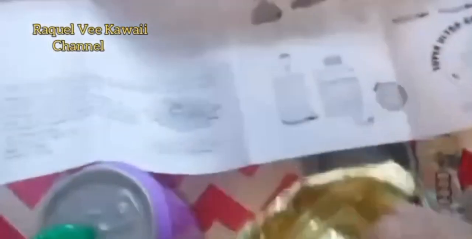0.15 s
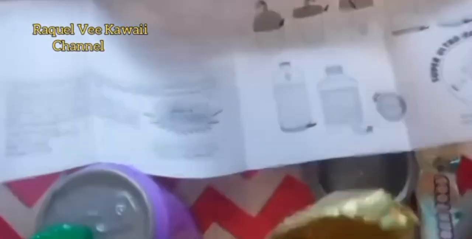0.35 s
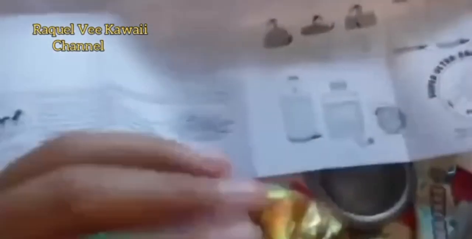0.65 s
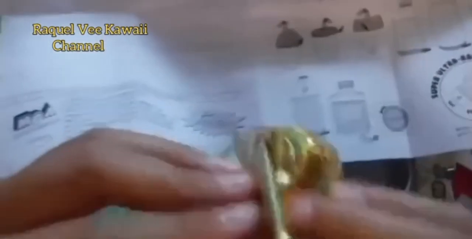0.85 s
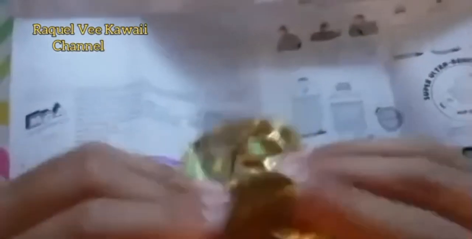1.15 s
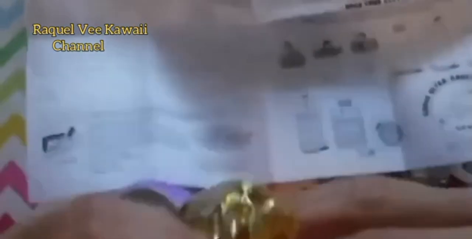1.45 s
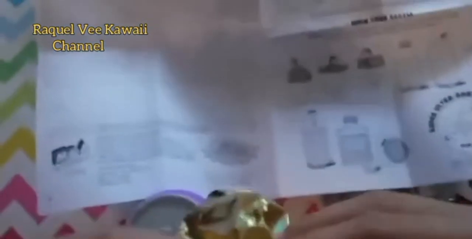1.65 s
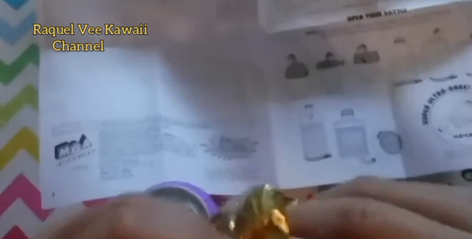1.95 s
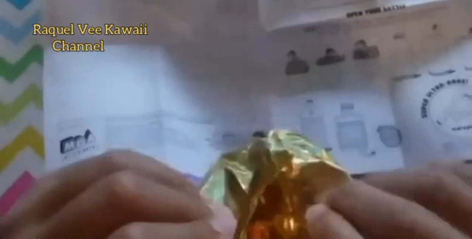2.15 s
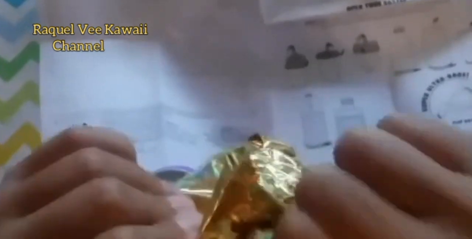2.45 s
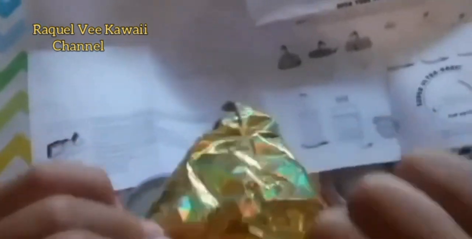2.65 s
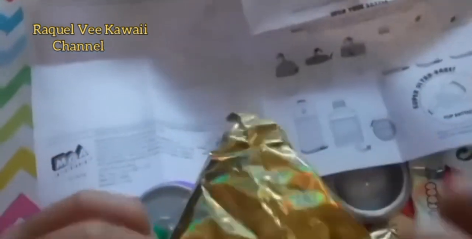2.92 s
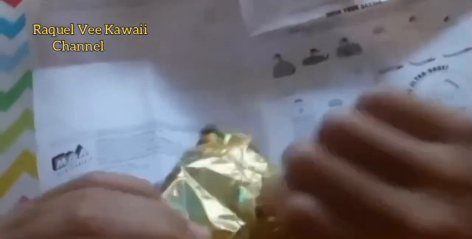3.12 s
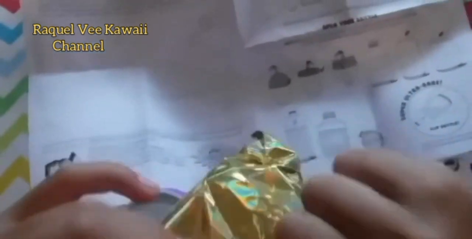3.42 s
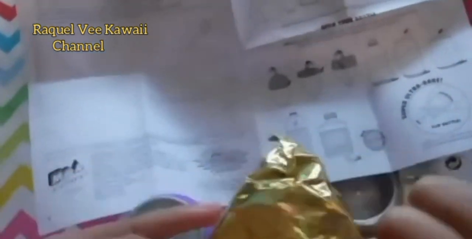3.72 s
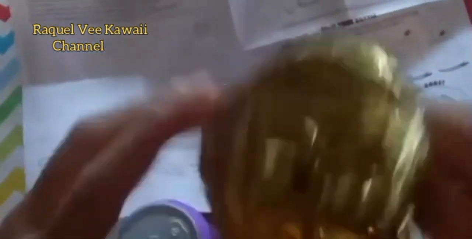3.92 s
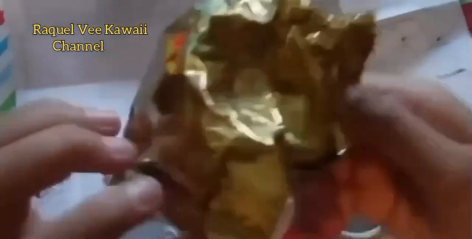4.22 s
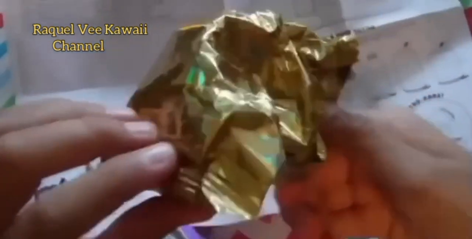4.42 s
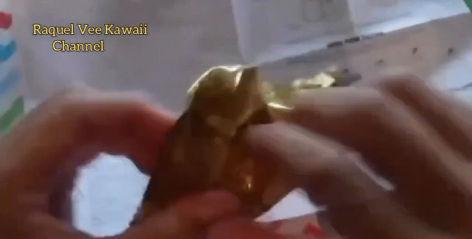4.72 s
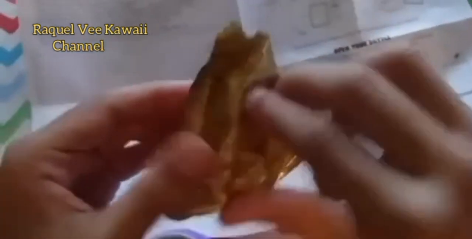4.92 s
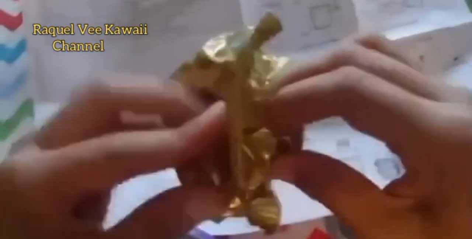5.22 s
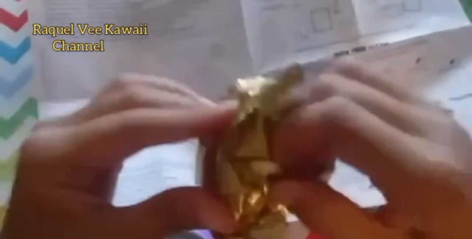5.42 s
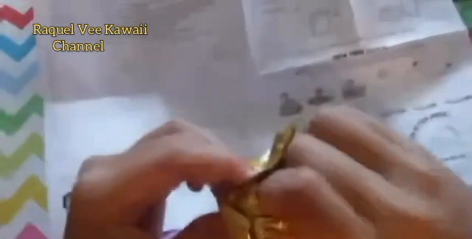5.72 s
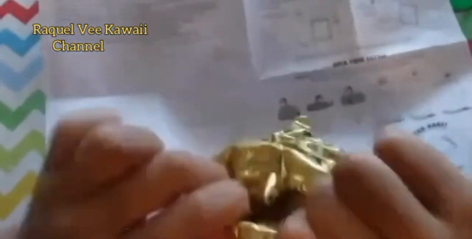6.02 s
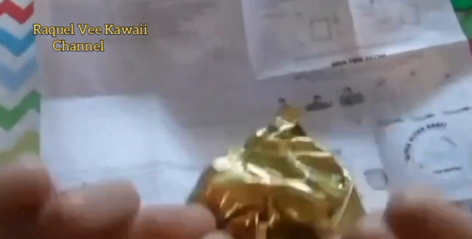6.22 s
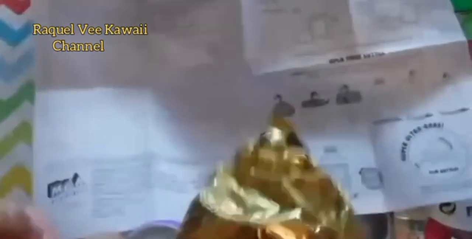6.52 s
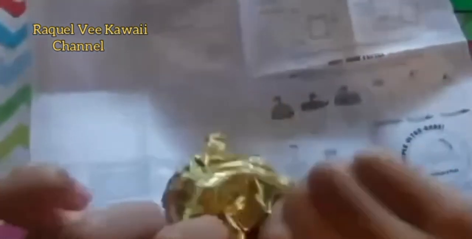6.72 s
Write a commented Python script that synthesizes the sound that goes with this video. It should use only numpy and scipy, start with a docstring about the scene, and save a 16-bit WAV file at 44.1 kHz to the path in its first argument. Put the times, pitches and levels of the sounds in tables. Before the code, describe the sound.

Close, dry crinkling of a metallic wrapper in a quiet room: rapid snaps, fine rustle, a sparse lull, then renewed crackling and a brief creak.

```python
"""A stiff foil wrapper is crumpled by two hands close to a microphone in a quiet room.
Each crease is a noise burst plus a kick: a short bright crack, a ringing facet, a dull flex of the sheet.
Loud snaps are listed; random small creases and filtered-noise rustle follow the squeezes of the fingers.
Large folds add puffs of air, a finger creaks once along the foil, and wavering room hiss lies below.
"""
import sys
import numpy as np
from scipy import signal
from scipy.fft import rfft, irfft, next_fast_len
from scipy.io import wavfile
from scipy.ndimage import uniform_filter1d

SR = 44100
rng = np.random.default_rng(int(sys.argv[2]) if len(sys.argv) > 2 else 0)


def wav_out(sig):
    """Save sig, one row per channel (or a flat mono array), as 16-bit PCM at SR to the path in sys.argv[1]."""
    wavfile.write(sys.argv[1], SR, np.round(np.clip(np.atleast_2d(sig).T, -1, 1) * 32767).astype(np.int16))


N = 302594
GRAIN = 768  # samples per burst
GRAIN_T = (np.arange(GRAIN) - GRAIN // 2)[None] / SR  # s, 0 at the centre


def undb(db):
    """Amplitude factor of a level in dB."""
    return 10 ** (np.asarray(db) / 20)


def level(x, db):
    """Scale x to an RMS level in dB."""
    return x * undb(db) / np.sqrt(np.mean(x ** 2))


def colour(x, table):
    """Filter the last axis by a (f/Hz, level/dB) spectrum, interpolated over log frequency."""
    hz, db = np.transpose(table)
    f = np.arange(x.shape[-1] // 2 + 1) * SR / x.shape[-1]
    gain = undb(np.interp(np.log(f + 1), np.log(hz), db))
    return irfft(rfft(x) * gain, x.shape[-1])


def resonance(x, hz, sharpness):
    """Each row through its own second-order band-pass; sharpness is its Q."""
    tune = (np.arange(GRAIN // 2 + 1) * SR / GRAIN + 1) / hz[:, None]
    return irfft(rfft(x) / (1 + 1j * sharpness * (tune - 1 / tune)), GRAIN)


def waver(s):
    """Smooth random wandering with spread 1 that changes over s seconds."""
    k = int(s * SR)
    return level(uniform_filter1d(uniform_filter1d(rng.standard_normal(N), k), k), 0)


def lay(s, grains):
    """Sum grains into one track, each centred on its time."""
    at = (s * SR).astype(int)[:, None] + np.arange(GRAIN) - GRAIN // 2
    at = np.clip(at, 0, N)
    return np.bincount(at.ravel(), grains.ravel(), N + 1)[:N]


RISE_SHARE, FALL_SHARE, BLUNT = .22, .5, 1.15  # time constants / burst length, decay exponent


def swell(t, rise, fall):
    """Quick build-up to t = 0, slower fall after it."""
    reach = np.maximum(-t / rise, t / fall)
    return np.exp(-reach ** BLUNT)


def even_peak(x):
    """Scale each row to an envelope of 1 over its loudest millisecond, about 40 samples."""
    power = uniform_filter1d(2 * x ** 2, size=40)
    return x / np.sqrt(power.max(axis=1, keepdims=True))


SNAP_MS, SNAP_SPREAD = 4.45, 0.27  # median burst length, log spread
KICK_DB, KICK_SCATTER_DB = 18, 4  # re burst noise, at length SNAP_MS
EDGE_HZ, EDGE_OCTAVES, EDGE_SHARPNESS = 8570, 0.41, 2.43
FACET_SHARPNESS = 1.5
SHEET_DB = -12.5  # re facet ring
SHEET_HZ, SHEET_OCTAVES, SHEET_SHARPNESS = 760, .25, 2
# brightness of a crack at the microphone: f/Hz, level/dB
CRACK_SPECTRUM = [(300, -26), (2000, -4), (5400, -4), (7500, -2), (9700, 3.5), (12000, -5), (15200, -22.5)]


def buckle(s, db, ring_db, hz, ms, edge_hz=EDGE_HZ, edge_octaves=EDGE_OCTAVES, sharpness=FACET_SHARPNESS):
    """One burst per crease: noise and a kick excite the crack, its facet and the flexing sheet."""
    n = len(s)
    length_s = ms[:, None] / 1000
    shape = swell(GRAIN_T, RISE_SHARE * length_s, FALL_SHARE * length_s)
    # the instant the crease gives way
    sign = np.sign(rng.standard_normal((n, 1)))
    kick_gain = undb(KICK_DB + KICK_SCATTER_DB * rng.standard_normal((n, 1)))
    kick = (GRAIN_T == 0) * sign * np.sqrt(ms[:, None] / SNAP_MS) * kick_gain
    burst = rng.standard_normal((n, GRAIN)) * shape + kick
    facet_burst = rng.standard_normal((n, GRAIN)) * shape + kick

    # every crease edge has its own colour
    edges_hz = edge_hz * 2 ** (edge_octaves * rng.standard_normal(n))
    crack = resonance(colour(burst, CRACK_SPECTRUM), edges_hz, EDGE_SHARPNESS)
    ring = resonance(resonance(facet_burst, hz, sharpness), hz, sharpness)
    sheet_hz = SHEET_HZ * 2 ** (SHEET_OCTAVES * rng.standard_normal(n))
    sheet = resonance(burst, sheet_hz, SHEET_SHARPNESS)
    dull = undb(ring_db)[:, None] * (even_peak(ring) + undb(SHEET_DB) * even_peak(sheet))
    return lay(s, undb(db)[:, None] * (even_peak(crack) + dull))


GRIP_DB_PER_S, LET_GO_DB_PER_S, SETTLE_DB, SETTLE_DB_PER_S = 501, 497, 7, 137
# squeezes of the fingers: start t/s, hold/s, small crackle level/dB, facet ring re crack level/dB
SQUEEZES = [(0.0, 0.257, -28.5, -5.5), (0.329, 0.1, -49, 0.5), (0.439, 0.06, -40.5, 2.5),
            (0.652, 0.01, -37, 6.5), (0.763, 0.022, -25.5, -3), (0.902, 0.031, -23.5, -2),
            (0.991, 0.099, -30, -5.5), (1.129, 0.0029, -29.5, 3.5), (1.202, 0.003, -29.5, -7.5),
            (1.277, 0.011, -26.5, -3.5), (1.399, 0.018, -37, -0.5), (1.573, 0.017, -41.5, -29),
            (1.686, 0.0038, -28.5, -10), (1.803, 0.037, -36, 5), (1.869, 0.15, -26.5, -14.5),
            (2.064, 0.027, -19, -13), (2.17, 0.032, -19, -5), (2.223, 0.0032, -27.5, 3),
            (2.265, 0.21, -26.5, -8.5), (2.509, 0.2, -40.5, -4), (2.782, 0.034, -25.5, -9.5),
            (2.977, 0.059, -28, -5), (3.107, 0.091, -43, 2.5), (3.192, 0.046, -35, 4.5),
            (3.295, 0.088, -25.5, -5.5), (3.524, 0.11, -40.5, -0.5), (3.785, 0.1, -37, -0.5),
            (3.967, 0.0078, -51.5, -21), (4.122, 0.011, -44.5, 0), (4.236, 0.149, -44.5, 3.5),
            (4.457, 0.08, -43.5, -3), (4.675, 0.029, -42, 7), (4.792, 0.13, -39.5, -3),
            (4.98, 0.084, -21, -8), (5.192, 0.039, -23.5, -5.5), (5.3, 0.042, -33.5, -3),
            (5.395, 0.0048, -21, -11), (5.445, 0.26, -29.5, -7), (5.752, 0.084, -25, -6.5),
            (5.883, 0.09, -23, -9.5), (6.018, 0.35, -24.5, -16.5), (6.428, 0.045, -42, -5.5),
            (6.545, 0.14, -28, -6.5), (6.784, 0.068, -29, -10.5)]


def effort():
    """Each squeeze rises, holds and dies away; returns summed level and mean facet ring, in dB."""
    t = np.arange(0, N + 64, 64) / SR
    s, hold, db, ring_db = np.transpose(SQUEEZES)[:, :, None]
    before = s - t
    after = t - s - hold
    # a quick drop, then the foil settles more slowly
    fall_db = np.minimum(LET_GO_DB_PER_S * after, SETTLE_DB + SETTLE_DB_PER_S * after)
    fade_db = np.clip(np.maximum(GRIP_DB_PER_S * before, fall_db), 0, 200)
    power = undb(db - fade_db) ** 2
    total = power.sum(axis=0)
    mean_ring_db = (power * ring_db).sum(axis=0) / total
    at = np.arange(N) / SR
    return np.interp(at, t, 10 * np.log10(total)), np.interp(at, t, mean_ring_db)


SMALL_PER_S = 320  # candidates, before thinning
BUSY_DB, THINNING = -25, .4  # all candidates break above BUSY_DB; dB of chance per dB of effort
SMALL_DB, SMALL_SCATTER_DB, LARGEST = 3, 5, 0.95  # re effort, exponential scatter, its cut-off quantile
SMALL_MS, SMALL_SPREAD, SMALL_MIX_DB = 2.5, .8, 16  # median length, +- log range, full ring range
SMALL_FACET_HZ, FACET_OCTAVES = 2700, 1.1  # median, +- range


def crackle(work_db, ring_db):
    """Small creases buckle at random moments, few large and many tiny."""
    chance = rng.random((int(N / SR * SMALL_PER_S), 6))
    # a light touch breaks fewer creases
    busy = undb((work_db[(chance[:, 0] * N).astype(int)] - BUSY_DB) * THINNING)
    when, size, facet, mix, long, _ = chance[chance[:, -1] < busy].T
    at = (when * N).astype(int)
    size_db = work_db[at] + SMALL_DB - SMALL_SCATTER_DB * np.log(1 - LARGEST * size)
    hz = SMALL_FACET_HZ * 2 ** (FACET_OCTAVES * (2 * facet - 1))
    small_ring_db = ring_db[at] + SMALL_MIX_DB * (mix - .5)
    ms = SMALL_MS * np.exp(SMALL_SPREAD * (2 * long - 1))
    return buckle(when * N / SR, size_db, small_ring_db, hz, ms)


RUSTLE_DB = -3.5  # skin noise re effort
RUB_BODY_HZ, RUB_BODY_DB = 2410, 7
RUSTLE_PATCHY_DB, RUSTLE_PATCH_S, RUSTLE_SPLIT_HZ = 4, .007, (1500, 3500, 7000)
# rustle of skin on foil: f/Hz, level/dB
RUB_SPECTRUM = [(300, -13.5), (3000, -3), (9700, 0.5), (16000, -13.5)]


def rustle(work_db, ring_db):
    """Skin rubs on foil: coloured noise follows the effort, patchy in four bands."""
    rub = level(colour(rng.standard_normal(N), RUB_SPECTRUM), RUSTLE_DB)
    # the facets hum along when they are free to ring
    body = signal.filtfilt(*signal.butter(2, RUB_BODY_HZ, fs=SR), rub)
    full = rub + body * (undb(ring_db + RUB_BODY_DB) - 1)
    lows = [signal.sosfiltfilt(signal.butter(2, hz, fs=SR, output="sos"), full) for hz in RUSTLE_SPLIT_HZ]
    bands = np.diff([0 * full, *lows, full], axis=0)
    # each band comes and goes by itself
    patchy = sum(band * undb(RUSTLE_PATCHY_DB * waver(RUSTLE_PATCH_S)) for band in bands)
    return undb(work_db) * patchy


ROOM_DB, ROOM_WAVER_DB, ROOM_WAVER_S = -52, 2.5, .03
# quiet room and microphone hiss: f/Hz, relative density level/dB per Hz
ROOM_SPECTRUM = [(20, 14), (250, 14.5), (500, 12.5), (1760, 9), (4200, 1), (11500, 1), (16000, -9.5)]


def room_hiss():
    """Coloured noise of the quiet room and the microphone, wavering in level."""
    hiss = colour(rng.standard_normal(N), ROOM_SPECTRUM)
    return level(hiss * undb(ROOM_WAVER_DB * waver(ROOM_WAVER_S)), ROOM_DB)


# loud snaps: t/s, crack level/dB, facet ring re crack level/dB, facet f/Hz
LOUD_SNAPS = [(0.0067, 1, -8, 3022), (0.047, -9, -8, 3705), (0.054, -6, -17, 3680), (0.0865, -8, -7, 2532),
              (0.1146, -21, -5, 4150), (0.1257, -9, -11, 2860), (0.1404, -16, -3, 3510),
              (0.148, -8.5, -4, 4130), (0.168, -12, -14, 3454), (0.1864, -4.5, -26, 3040),
              (0.277, -22, 2, 3753), (0.3337, -19, 1, 3930), (0.395, -26.5, -12, 1713),
              (0.4445, -9, 2, 5220), (0.4516, -15.5, 0.5, 1980), (0.4918, -18, -13, 2584),
              (0.5159, -22, 5, 3720), (0.5354, -9.5, -11.5, 3960), (0.6487, -13.5, -17, 3270),
              (0.6754, -5.5, -8.5, 3895), (0.715, -7.5, -9, 3224), (0.7525, -4.5, -8, 2118),
              (0.7778, -8.5, -2, 3900), (0.817, -10, -9, 3110), (0.8652, -2.5, -9, 2244),
              (0.912, -8, -7, 3379), (0.922, -6, -17, 3773), (0.972, -10.5, 3, 3920),
              (0.9892, -6.5, -8, 3150), (1.0044, 0.5, -11.5, 1991), (1.009, -5.5, -5, 2678),
              (1.049, -9, -18, 3550), (1.072, -9.5, -5, 4350), (1.1045, -7, -6, 3030),
              (1.1503, -14, 0.5, 3512), (1.196, -13, -27.5, 2372), (1.2625, -2.5, -10, 3160),
              (1.2784, -8, -17.5, 3575), (1.294, -2.5, -8.5, 3740), (1.3322, -13.5, -14, 3200),
              (1.364, -29.5, 12, 3990), (1.385, -6, -7, 2720), (1.558, -14, -5, 3754),
              (1.5759, -8.5, -32.5, 4490), (1.5973, -19, -10, 3050), (1.6476, -5.5, -22, 3360),
              (1.6668, -14, 0, 3750), (1.6836, -11, -6.5, 4160), (1.792, -22.5, 3, 797),
              (1.799, -10.5, -7, 1100), (1.82, 1.5, -25, 3230), (1.868, -10, -28, 4058),
              (1.876, -3.5, -16, 3134), (1.8862, -10.5, -19, 4580), (1.9017, -3.5, -33, 4547),
              (1.9248, -5.5, -14, 2980), (1.9725, -5.5, -5, 4654), (2.001, -4.5, -14.5, 3342),
              (2.0364, -2.5, -10.5, 3014), (2.06, -6, -28, 3360), (2.067, -4, -24.5, 3494),
              (2.0733, -11, -3, 4620), (2.0812, -12, -3, 4590), (2.093, 2, -15, 4900),
              (2.162, -14, 2.5, 3750), (2.1926, -1.5, -10.5, 4204), (2.196, -3.5, -11.5, 798.6),
              (2.2188, -3, -9, 3024), (2.2392, 1, -16.5, 1850), (2.252, 0, -21, 2730),
              (2.256, -2, -8.5, 4290), (2.2921, -7, -9, 3525), (2.3239, -3.5, -3, 3163),
              (2.3846, -17.5, -3, 3023), (2.4126, -13, 3.5, 2264), (2.422, -4.5, -5.5, 4200),
              (2.479, -9.5, -33, 4355), (2.5659, -4.5, -34, 4207), (2.571, -15, -7, 2400),
              (2.5883, -10.5, -23, 2900), (2.607, -18, 3.5, 2740), (2.6286, -9, -3.5, 3630),
              (2.656, -9, -33, 4460), (2.665, -11, -26, 4700), (2.683, -10.5, -8, 2510),
              (2.7321, -16, -8.5, 3670), (2.752, -3.5, -29.5, 4090), (2.7902, -2.5, -9, 4190),
              (2.918, -33.5, 11, 3393), (2.9365, -8, -8, 3265), (2.9559, -10.5, -9.5, 3610),
              (2.9798, -11, -20, 2600), (2.997, -10, -11, 3680), (3.006, -13.5, 4, 3670),
              (3.0329, -2, -9, 3684), (3.0748, -14, -12, 2917), (3.139, -31, 5, 3480),
              (3.1634, -11, -5, 2710), (3.1941, -12, 1, 3626), (3.2081, -2.5, -12, 2700),
              (3.2124, -6.5, -11, 4173), (3.251, -10.5, -7.5, 2634), (3.2622, -7.5, -7, 860),
              (3.275, -10, -5.5, 1690), (3.3715, -13, -13, 1762), (3.3946, -13, -10, 2640),
              (3.4226, -10, -0.5, 2070), (3.5036, -13, -24, 3090), (3.5112, -4.5, -8.5, 2410),
              (3.5208, -12, -6, 1400), (3.574, -16.5, -28, 2380), (3.5984, -10, -1.5, 2860),
              (3.6067, -15.0, -4, 3080), (3.6584, -15, -8, 2562), (3.8714, -11, -9.5, 2478),
              (3.974, -25.5, 1.5, 3296), (4.131, -22, -11, 2760), (4.2426, -6.5, -5.5, 1940),
              (4.2877, -21, 0, 3490), (4.3596, -17, -1, 2207), (4.439, -12, 5, 3970),
              (4.4876, -7, -10.5, 2544), (4.652, -10.5, -10, 3010), (4.759, -13.5, -2.5, 1490),
              (4.7635, -18, 2, 2910), (4.7933, -23, -1, 4290), (4.824, -17, -6, 3000),
              (4.839, -2, -18, 3017), (4.892, -18.5, -4.5, 2000), (4.9373, -6.5, -5, 3740),
              (4.9434, -12.5, -8, 4060), (4.95, -2.5, -7, 3466), (4.9848, -4, -6, 3400),
              (4.9894, 1, -7, 4360), (5.0054, -3, -22, 3620), (5.013, -7.5, -14, 700),
              (5.042, -14, -1, 2700), (5.1496, -1, -8.5, 2777), (5.1683, -11, -3, 2200),
              (5.206, -11.5, -11.5, 2810), (5.2138, -1, -20, 3023), (5.224, 4, -18, 3600),
              (5.2561, -5, -7.5, 2730), (5.285, -4, -8, 3570), (5.295, -9.5, -6.5, 2864),
              (5.3206, -7, -11, 3544), (5.331, -10.5, 2.5, 4223), (5.3833, -8.5, -9, 2973),
              (5.3928, -3, -8.5, 2680), (5.4058, -13, -1, 2584), (5.427, -6, -3, 3070),
              (5.476, -6.5, -4.5, 2490), (5.4909, -8, -27, 4120), (5.5137, 1, -12.5, 3863),
              (5.5233, -3, -7.5, 2643), (5.5699, -12, -15, 2090), (5.579, -6.5, -8, 2835),
              (5.646, -8, -3, 2050), (5.6592, -6.5, -2.5, 2737), (5.698, -22.5, 11, 3437),
              (5.798, -3, -26, 4270), (5.8417, -19.5, 6.5, 2310), (5.8507, -5.5, -11, 2348),
              (5.899, -6, -11.5, 3320), (5.924, 1.5, -10, 2872), (5.978, -14, -6, 4424),
              (6.0159, -9.5, -13, 4380), (6.068, -7.5, -4, 3700), (6.168, -7, -32, 3993),
              (6.2614, -0.5, -4.5, 2475), (6.321, -6.5, -1.5, 2926), (6.4118, -10, -2.5, 4683),
              (6.4935, -19.5, -1.5, 2530), (6.529, -9, -6, 3713), (6.538, -10.5, -23, 3645),
              (6.5668, -8.5, -5, 3140), (6.6072, -10, -3.5, 4114), (6.6564, -2.5, -17, 3556),
              (6.716, -16, 4.5, 3084), (6.7755, -14, -8, 4580), (6.793, -6, -5.5, 2828),
              (6.8361, -0.5, -15, 3826)]


def snaps():
    """The loud creases buckle, each with a slightly different burst length."""
    s, db, ring_db, hz = np.transpose(LOUD_SNAPS)
    ms = SNAP_MS * np.exp(SNAP_SPREAD * rng.standard_normal(len(s)))
    return buckle(s, db, ring_db, hz, ms)


THUD_S = 0.00064  # Gaussian half-width at 1/e
# large folds collapse: t/s, peak level/dB
FOLD_THUDS = [(0.01, -24), (0.45, -27.5), (1.003, -22), (1.294, -26.5), (2.061, -26), (2.196, -20),
              (2.328, -22), (4.986, -27), (6.166, -31), (6.322, -24.5)]


def thuds():
    """One-sided puffs of air when a large fold gives way near the microphone."""
    s, db = np.transpose(FOLD_THUDS)
    return lay(s, undb(db)[:, None] * np.exp(-(GRAIN_T / THUD_S) ** 2))


CREAK_MS, CREAK_JITTER, CREAK_SCATTER_DB = .35, .05, 2  # jitter in slip periods
CREAK_RING_DB, CREAK_HZ, CREAK_EDGE_HZ, CREAK_SHARPNESS = -16, 3200, 10300, 5
# a finger drags and creaks: t/s, slip rate f/Hz, level/dB
CREAK_DRAG = [(6.05, 390, -20), (6.085, 390, -11), (6.1, 300, -10), (6.125, 245, -13), (6.18, 215, -15),
              (6.235, 225, -11), (6.3, 210, -14), (6.345, 240, -16), (6.375, 330, -28)]


def creak():
    """Stick-slip: nearly even, very short ticks whose rate follows the drag."""
    s, rate_hz, db = np.transpose(CREAK_DRAG)
    t = np.arange(s[0], s[-1], 1 / SR)
    turns = np.cumsum(np.interp(t, s, rate_hz)) / SR
    when = t[1:][np.diff(np.floor(turns)) > 0]
    jitter, scatter = rng.standard_normal((2, len(when)))
    when = when + CREAK_JITTER * jitter / np.interp(when, s, rate_hz)
    tick_db = np.interp(when, s, db) + CREAK_SCATTER_DB * scatter
    same = np.ones(len(when))
    return buckle(when, tick_db, CREAK_RING_DB * same, CREAK_HZ * same, CREAK_MS * same,
                  CREAK_EDGE_HZ, edge_octaves=0, sharpness=CREAK_SHARPNESS)


WIDE_S = .002
# level of the side signal, a little treble width: f/Hz, level/dB
SIDE_SPECTRUM = [(3500, -60), (4200, -7), (9700, -9), (15200, -7)]


def treble_width(mono):
    """Side signal: the input with wandering phase, filtered to its treble."""
    analytic = signal.hilbert(mono, next_fast_len(N))[:N]
    turned = np.real(analytic * np.exp(1j * np.pi * waver(WIDE_S)))
    return colour(turned, SIDE_SPECTRUM)


def scene():
    """Foil and room in the middle; the treble is a little wide."""
    work_db, ring_db = effort()
    foil = crackle(work_db, ring_db) + rustle(work_db, ring_db) + snaps() + thuds() + creak()
    mid = foil + room_hiss()
    side = treble_width(foil)
    return np.array([mid + side, mid - side])


TOP_HZ, CEILING = 16000, .86


def record(dry):
    """The loudest peaks clip at CEILING; a steep zero-phase low-pass cuts the top."""
    cut = signal.ellip(12, .2, 80, TOP_HZ, fs=SR, output="sos")
    return signal.sosfiltfilt(cut, np.clip(dry, -CEILING, CEILING))


dry = scene()
out = record(dry)
wav_out(out)
```